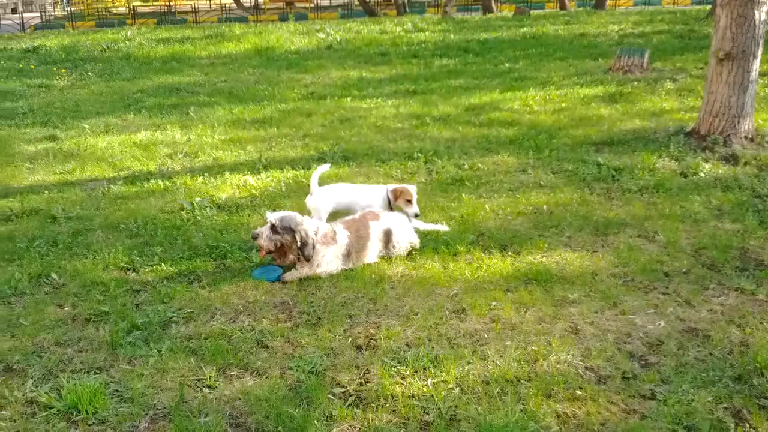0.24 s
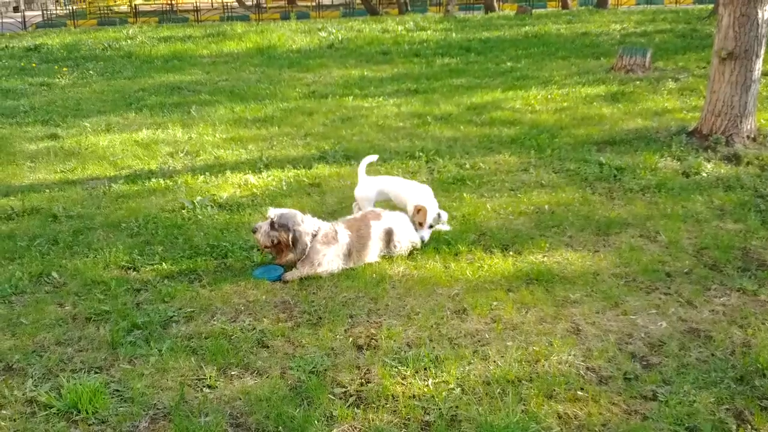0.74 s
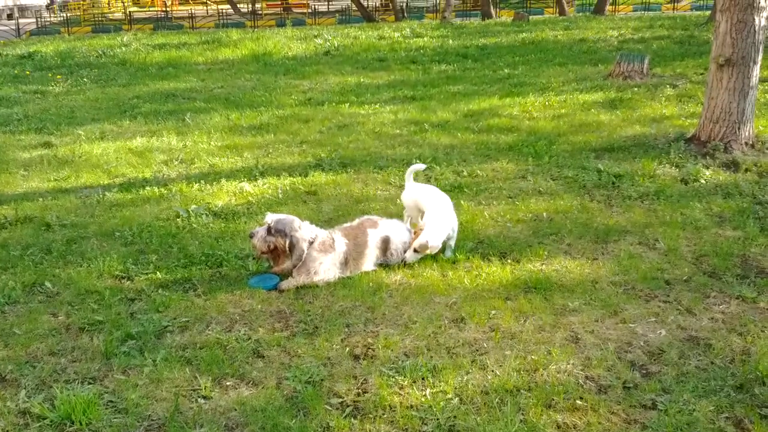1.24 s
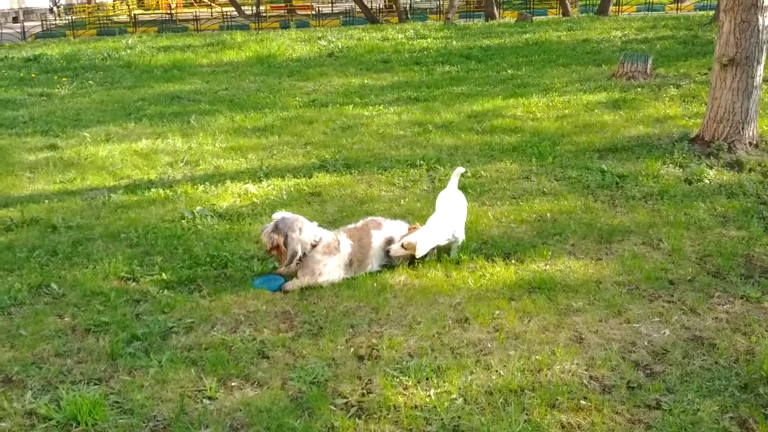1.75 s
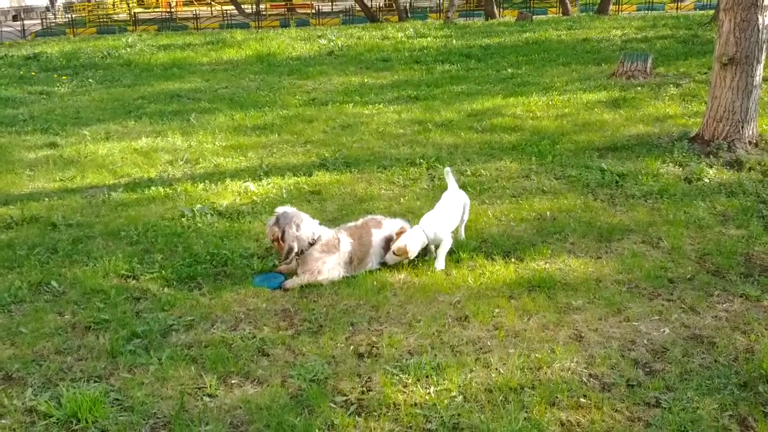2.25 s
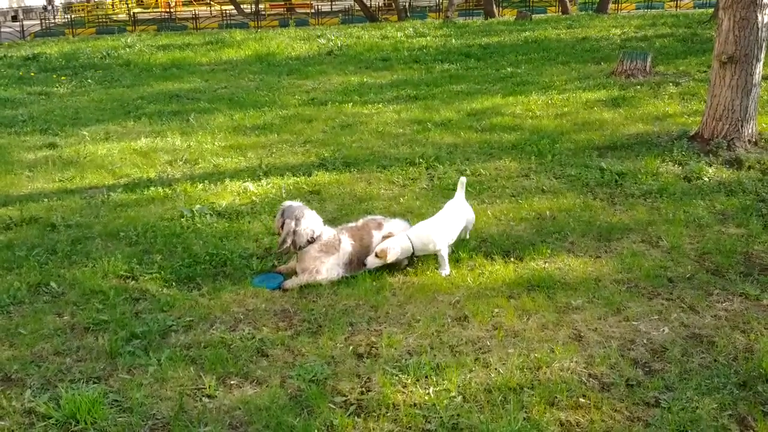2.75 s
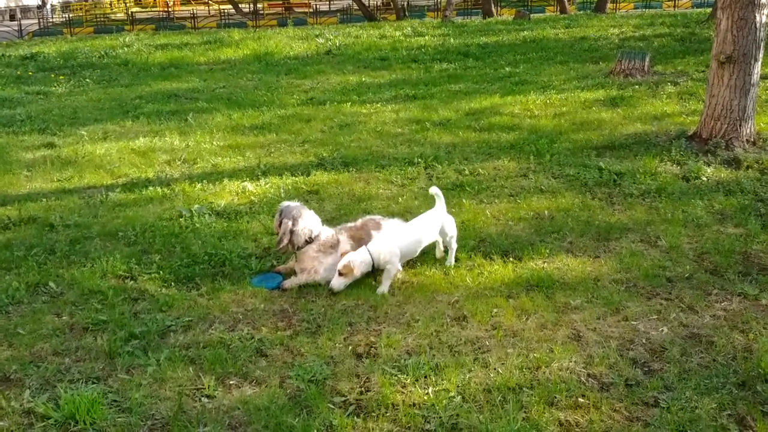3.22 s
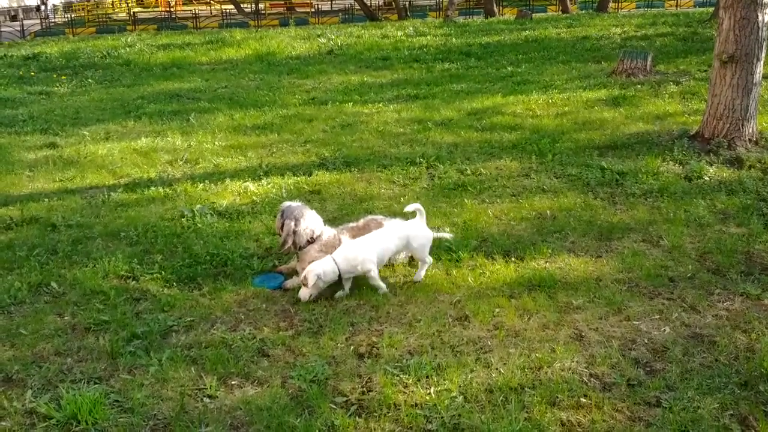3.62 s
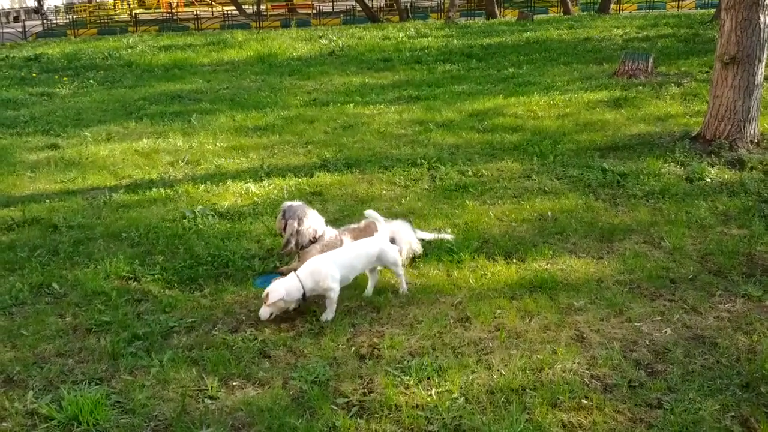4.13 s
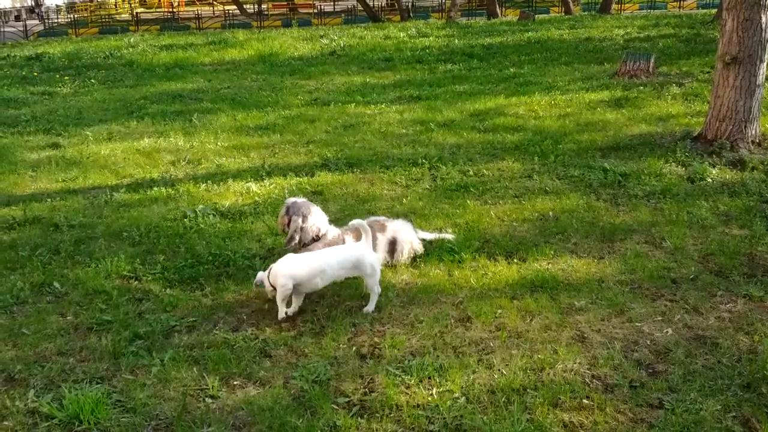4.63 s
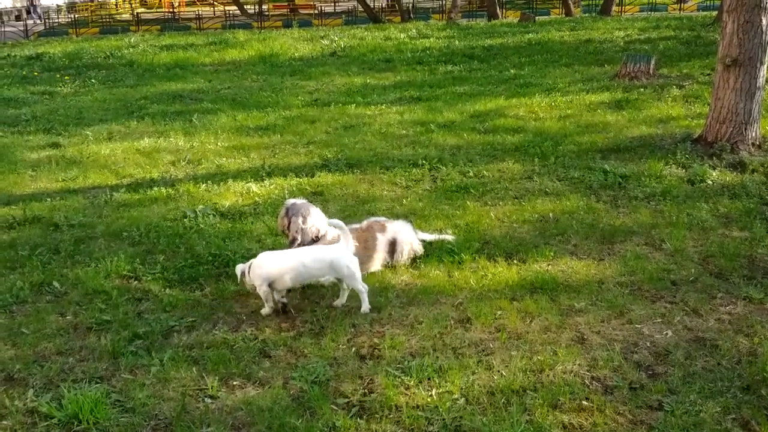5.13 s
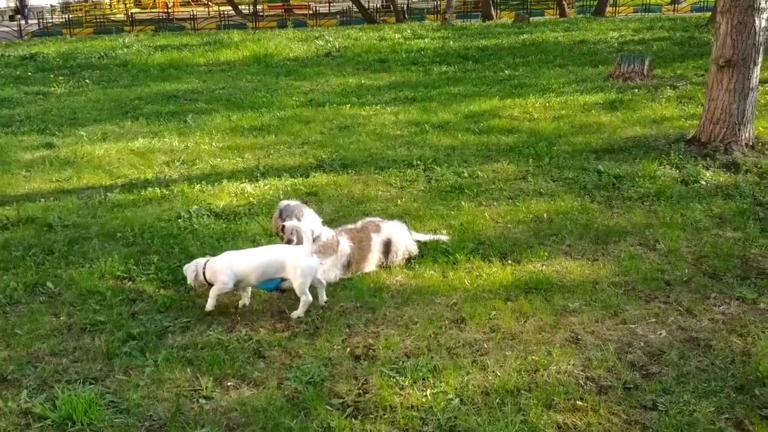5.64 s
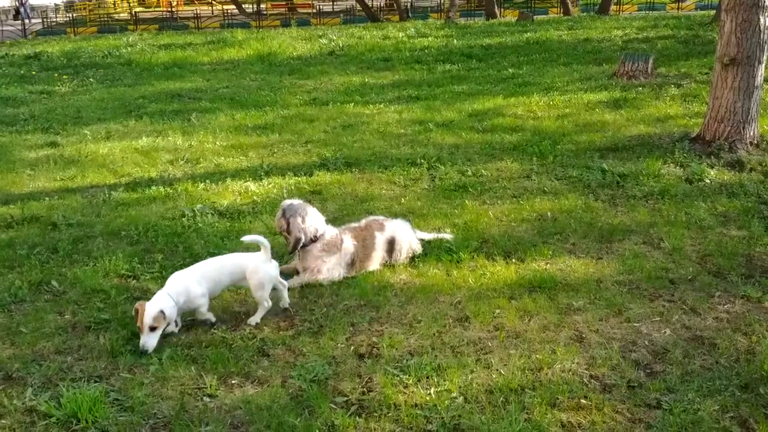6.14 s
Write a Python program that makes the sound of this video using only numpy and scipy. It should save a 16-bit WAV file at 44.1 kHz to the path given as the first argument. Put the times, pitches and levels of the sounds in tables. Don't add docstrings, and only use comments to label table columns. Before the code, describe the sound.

Distant road traffic heard from a grassy park through one microphone, almost mono. A heavy lorry's low drone and broad tyre hiss are strongest in the first two seconds, then recede into soft rumble and roar. A sparrow gives short hoarse chirrups near the start, around the middle and towards the end. Two dogs moving through grass add very faint brushing and tiny dry ticks.

```python
import sys
import numpy as np
from scipy import signal
from scipy.fft import rfft, irfft, next_fast_len
from scipy.io import wavfile
from scipy.ndimage import uniform_filter1d, map_coordinates

SR = 44100
rng = np.random.default_rng(int(sys.argv[2]) if len(sys.argv) > 2 else 0)


def transcribe(signal):
    frames = np.atleast_2d(signal).T
    limited = np.clip(frames, -1, 1)
    pcm = np.round(limited * 32767).astype(np.int16)
    wavfile.write(sys.argv[1], SR, pcm)


def gain_from_db(level_db):
    decades = np.asarray(level_db, float) / 20
    return 10 ** decades


N = 281137
TIME = np.arange(N) / SR


def unit(x):
    return x / np.sqrt(np.mean(x ** 2) + 1e-20)


def curves(rows):
    s, *columns = np.transpose(rows)
    return [np.interp(TIME, s, column) for column in columns]


def wobble(rate):
    knots = rng.standard_normal(int(N * rate / SR) + 4)
    return map_coordinates(knots, [np.arange(N) * rate / SR])


def bump(centre_s, half_width_s):
    return np.exp(-((TIME - centre_s) / half_width_s) ** 2)


def rush(spectrum, patchy_db):
    z = signal.stft(rng.standard_normal(N), nperseg=512)[2]
    field = uniform_filter1d(rng.standard_normal(z.shape), size=3, axis=0)
    field = uniform_filter1d(field, size=8, axis=1)
    noise = signal.istft(z * gain_from_db(patchy_db * unit(field)), nperseg=512)[1][:N]
    m = next_fast_len(N + 8192)
    hz, db = np.transpose(spectrum)
    log_bins = np.log(np.fft.rfftfreq(m, 1 / SR) + 1)
    colour = gain_from_db(np.interp(log_bins, np.log(hz + 1), db))
    return unit(irfft(rfft(noise, m) * colour, m)[:N])


# time in seconds, firing rate in Hz.
FIRING_RATE = [(0, 44), (1, 45.4), (2, 48.7), (2.4, 49.6), (3.2, 50.4), (4, 51.8), (4.3, 52), (4.6, 50.8),
               (5.2, 50.6), (5.7, 49.3), (6.37, 48.4)]
# time in seconds, level in dB.
FUNDAMENTAL = [(.06, -37), (.2, -38), (.4, -36), (.75, -40), (.9, -33), (1.25, -37), (1.59, -28.5),
               (1.85, -32), (2.2, -29.5), (2.45, -31.5), (2.77, -29.5), (2.9, -33), (3.38, -30.5),
               (4.05, -39), (4.25, -32.5), (4.5, -50), (5.15, -52), (5.75, -34)]
# time in seconds, strength of the higher orders in dB.
ENGINE_LOAD = [(0, -33), (.4, -3), (1.3, 2.5), (1.9, -2.5), (2.5, -5), (3, -7.5), (3.7, -6), (4.3, -12.5),
               (5.2, -2.5), (5.5, -9), (6.4, -6)]
# multiple of the firing rate, level at zero load strength in dB.
HIGHER_ORDERS = [(2, -41), (3, -48.5), (4, -49), (5, -48), (5.5, -53)]
SCATTERED_DB = -52
OTHER_DB, OTHER_FROM_S, OTHER_RISE_S = -45, 4.3, .15
BEAT_HZ, BEAT_PEAK_S = 3.92, 4.56


def engine():
    (hz,), (first_db,), (load_db,) = curves(FIRING_RATE), curves(FUNDAMENTAL), curves(ENGINE_LOAD)
    turn = 2 * np.pi * np.cumsum(hz) / SR
    drone = gain_from_db(first_db + 0.16 * wobble(2.1)) * np.sin(turn + 0.098 * wobble(5.9))
    drone += gain_from_db(SCATTERED_DB) * (wobble(7) * np.sin(turn) + wobble(7) * np.cos(turn))

    other_turn = turn + 2 * np.pi * BEAT_HZ * (TIME - BEAT_PEAK_S)
    other_swell = np.clip((TIME - OTHER_FROM_S) / OTHER_RISE_S, 0, 1)
    drone += gain_from_db(OTHER_DB) * other_swell * np.sin(other_turn)

    for multiple, db in HIGHER_ORDERS:
        wavering_turn = multiple * (turn + 0.17 * wobble(6))
        drone += gain_from_db(load_db + db + 0.48 * wobble(6)) * np.sin(wavering_turn)
    return np.sqrt(2) * drone


# time in seconds, nearness in dB (0 = closest).
NEARNESS_CURVE = [(.06, -6), (.3, -4), (.44, -1.5), (.69, 0), (.85, -1.5), (1.34, 0), (1.76, -2),
                  (1.91, -4), (2.5, -6.5), (2.65, -7), (3.2, -10), (4.05, -9), (4.3, -10.5), (4.8, -11),
                  (4.92, -10), (5.1, -11), (5.7, -12), (6.1, -13.5)]
# time in seconds, half width in seconds, lift in dB.
PASSING_CARS = [
    (.05, .3, 1.5),
    (.6, .2, 1),
    (1, 0.19, 0.5),
    (2.05, 0.17, 1.5),
    (3.1, 0.14, 1.5),
    (3.8, 0.22, 2),
    (5.7, 0.32, 3),
]
# frequency in Hz, density in dB per Hz.
DEEP_SPECTRUM = [(8, -31), (16, -19), (23, -11), (29, 1), (40, -7), (50, -7.5), (65, 0), (80, -1.5),
                 (100, -3), (125, -8), (180, -60)]
# frequency in Hz, density in dB per Hz.
RUMBLE_SPECTRUM = [(60, -62), (95, -18.5), (125, -4), (170, -5), (230, -7.5), (280, -9.5), (350, -12),
                   (462, -17), (600, -30), (780, -47), (1320, -120)]
# frequency in Hz, density in dB per Hz.
ROAR_SPECTRUM = [(280, -8.5), (480, -9.5), (528, -4), (736, -1), (1220, 0), (2200, -7.5), (2860, -16.5),
                 (4840, -120)]
# frequency in Hz, density in dB per Hz.
TREAD_SPECTRUM = [(2000, -60), (2300, -6), (2460, 2), (2650, -6), (3000, -60)]
# frequency in Hz, density in dB per Hz.
FAR_HISS = [(1120, -19.5), (1900, -32), (2220, -6), (2680, 0), (3110, -3.5), (3790, -3), (4300, -4.5),
            (4560, -3.5), (4740, 0.5), (4920, -5.5), (5560, -6), (7030, -5), (8300, -19), (12000, -85)]
# frequency in Hz, density in dB per Hz.
NEAR_HISS = [(1120, -21), (1900, -11), (2200, -9.5), (2450, -4), (2750, -8), (3370, -6), (4940, -9),
             (5560, -6), (6300, -8.5), (7430, -9.5), (8300, -17.5), (10800, -49), (18300, -120)]
# frequency in Hz, density in dB per Hz.
FIZZ_SPECTRUM = [(4710, -6), (8000, -4), (9170, -4), (11100, -4.5), (12600, -12), (15800, -27)]
DEEP_DB, HISS_DB = -43, -38
RUMBLE_DB, RUMBLE_FADES_DB_PER_S, RUMBLE_FOLLOWS = -37, 1.5, 0.055
ROAR_DB, ROAR_FOLLOWS = -41.5, 0.49
FIZZ_DB, FIZZ_FOLLOWS, STILL_FIZZ_DB = -45, 1.26, -65
TREAD_DB, TREAD_S, TREAD_HALF_S = -50, 1.35, .55
SWELL_LOW, SWELL_HIGH = 0.78, 0.32
NEAR_FADES_DB = 10


def traffic():
    near_db, = curves(NEARNESS_CURVE)
    flutter = wobble(14)
    cars_db = sum(lift_db * bump(s, half_width) for s, half_width, lift_db in PASSING_CARS)

    deep = gain_from_db(DEEP_DB + .8 * wobble(2.2)) * rush(DEEP_SPECTRUM, patchy_db=.55)

    rumble_db = RUMBLE_DB - RUMBLE_FADES_DB_PER_S * TIME + RUMBLE_FOLLOWS * near_db
    rumble_db += 0.27 * wobble(2.7) + SWELL_LOW * cars_db
    rumble = gain_from_db(rumble_db) * rush(RUMBLE_SPECTRUM, patchy_db=0.2)

    roar_db = ROAR_DB + ROAR_FOLLOWS * near_db + SWELL_HIGH * cars_db + 0.11 * flutter
    roar = gain_from_db(roar_db) * rush(ROAR_SPECTRUM, patchy_db=0.3)

    tread = gain_from_db(TREAD_DB) * bump(TREAD_S, TREAD_HALF_S) * rush(TREAD_SPECTRUM, patchy_db=1.0)

    share = np.clip(1 + near_db / NEAR_FADES_DB, 0, 1)
    hiss = np.sqrt(share) * rush(NEAR_HISS, patchy_db=1.06)
    hiss += np.sqrt(1 - share) * rush(FAR_HISS, patchy_db=1.45)
    hiss *= gain_from_db(HISS_DB + near_db + 0.13 * flutter)

    fizz_strength = np.hypot(gain_from_db(FIZZ_DB + FIZZ_FOLLOWS * near_db), gain_from_db(STILL_FIZZ_DB))
    fizz = fizz_strength * gain_from_db(0.22 * flutter) * rush(FIZZ_SPECTRUM, patchy_db=1.2)
    return deep + rumble + roar + tread + hiss + fizz


# offset in seconds, length in seconds, first Hz, last Hz, level in dB.
ARCH_GLIDES = [(-.006, .018, 3600, 4800, -5), (.003, .022, 4720, 4540, -2), (.018, .012, 4500, 5300, -7),
               (.026, .016, 5100, 3450, -2), (.048, .018, 3600, 3100, -8), (.063, .019, 3400, 4000, 0),
               (.078, .016, 4000, 3100, -8)]
# start in seconds, level in dB.
ARCH_CALLS = [
    (.186, -42),
    (2.861, -39),
    (4.903, -43),
]
# offset in seconds, length in seconds, first Hz, last Hz, level in dB.
CHIRRUP_GLIDES = [(-.008, .013, 4900, 5750, -10), (-.001, .01, 5500, 5950, -2),
                  (.014, .022, 4280, 4080, -2), (.029, .013, 4150, 3550, -3), (.048, .018, 3650, 4250, -1),
                  (.063, .02, 4200, 3350, -8)]
# start in seconds, level in dB.
CHIRRUP_CALLS = [
    (.362, -40.5),
    (2.456, -40.5),
    (3.048, -39.5),
    (4.022, -46.5),
    (4.314, -46.5),
    (4.845, -42.5),
    (4.885, -49),
]


def sparrow():
    song = np.zeros(N)
    for glides, calls in (CHIRRUP_GLIDES, CHIRRUP_CALLS), (ARCH_GLIDES, ARCH_CALLS):
        for offset, length, first_hz, last_hz, glide_db in glides:
            u = np.linspace(-1, 1, round(length * SR))
            hz = np.linspace(first_hz, last_hz, len(u))
            turn = 2 * np.pi * np.cumsum(hz) / SR
            tone = np.sin(turn) + gain_from_db(-20) * np.sin(2 * turn) + gain_from_db(-25) * np.sin(3 * turn)
            swell = (1 - u * u) ** 0.6 * gain_from_db(glide_db)
            for start, db in calls:
                song[round((start + offset) * SR):][:len(u)] += gain_from_db(db) * swell * tone
    song *= gain_from_db(1.3 * wobble(90))

    t = np.arange(SR // 4) / SR
    scatter = rng.standard_normal(len(t)) * gain_from_db(-60 * t / .18) * (t > .004)
    blur = signal.fftconvolve(song, scatter / np.linalg.norm(scatter))[:N]
    return song + gain_from_db(-9) * blur


# start in seconds, length in seconds, level in dB.
BRUSHES = [
    (.4, .1, -62),
    (0.657, 0.073, -51),
    (2.023, 0.072, -50),
    (2.2, 0.28, -65),
    (2.857, .12, -62),
    (3.6, 0.46, -69),
    (4.194, 0.17, -56),
    (4.4, 1.35, -60),
]
RUSTLE_RISE_S, RUSTLE_FALL_S = 0.0099, 0.052


def rustle():
    strength = np.zeros(N)
    for start, length, db in BRUSHES:
        rise = np.clip((TIME - start) / RUSTLE_RISE_S, 0, 1)
        fall = np.exp(-np.clip(TIME - start - length, 0, None) / RUSTLE_FALL_S)
        strength += gain_from_db(db) * rise * fall
    return strength * gain_from_db(0.48 * wobble(14)) * rush(FIZZ_SPECTRUM, patchy_db=3.8)


# time in seconds, level in dB (the peak lies 9 dB above it), centre in Hz, relative
GRASS_TICKS = [(1.931, -56, 15200, .04), (1.938, -56, 15200, .04), (1.954, -56, 14300, .08),
               (1.963, -57, 15000, .04), (1.982, -52, 14300, .08), (1.9961, -44, 13800, .1),
               (2.804, -45, 6300, 0.092), (3.203, -55, 6200, .07), (3.208, -54, 12000, .2),
               (3.257, -56, 13500, .15), (3.37, -45, 6300, .07), (3.463, -54, 7300, .05),
               (4.196, -52, 12480, .15), (5.141, -54, 13200, .14), (5.926, -51, 9970, .3),
               (6.044, -55, 6000, .15), (6.05, -53, 7500, .2), (6.053, -53, 10000, .15),
               (6.056, -49, 10500, .18), (6.065, -51, 7000, .2), (6.08, -53, 13110, .2),
               (6.085, -54, 7200, .12), (6.09, -54, 6050, .15)]
SNAP_S, RING_S = 0.0061, .0003


def grass():
    out = np.zeros(N)
    t = np.arange(SR // 20) / SR
    for start, db, hz, spread in GRASS_TICKS:
        edges_hz = [hz * (1 - spread), hz * (1 + spread)]
        band = signal.butter(3, edges_hz, "bandpass", fs=SR, output="sos")
        decay = gain_from_db(-60 * t / (SNAP_S + RING_S / spread))
        snap = signal.sosfilt(band, rng.standard_normal(len(t)) * decay)
        out[round(start * SR):][:len(t)] += gain_from_db(db + 9.0) * snap / np.abs(snap).max()
    return out


def scene():
    sound = engine() + traffic() + sparrow() + rustle() + grass()
    return np.array([sound, sound])


SPLIT_TIMES = [.468, 1.118, 1.258, 1.258, 1.306, 1.327, 1.35, 1.35, 1.445, 1.445, 1.538, 1.817, 1.817,
               1.863, 1.863, 2.234, 2.397, 2.397, 2.721, 2.908, 2.908, 3.49, 3.655, 3.655, 4.325, 4.325,
               4.325, 4.348, 5.533]
SPLIT_LOW_HZ, SPLIT_TOP_HZ, SPLIT_WIDE_HZ = 4200, 15850, 1450
FRAME, GRID = 1024, 161


def side_bursts(mono):
    side = np.zeros(N)
    hz = np.fft.rfftfreq(2 * FRAME, 1 / SR)
    window = np.sin(np.pi * (np.arange(2 * FRAME) + .5) / (2 * FRAME))
    for s in SPLIT_TIMES:
        where, wide = rng.random(2)
        at = round((s * SR - GRID) / FRAME - 1) * FRAME + GRID
        high_hz = SPLIT_TOP_HZ - where ** 2 * (SPLIT_TOP_HZ - SPLIT_LOW_HZ - SPLIT_WIDE_HZ)
        low_hz = max(high_hz - SPLIT_WIDE_HZ * (1 + (wide > .75)), SPLIT_LOW_HZ)
        later = mono[at + 2 * FRAME:at + 4 * FRAME]
        band = irfft(rfft(later) * ((hz > low_hz) & (hz < high_hz)))
        rise, fall = np.split(window * band, 2)
        folded = np.r_[rise - rise[::-1], fall + fall[::-1]]
        side[at:at + 2 * FRAME] += gain_from_db(-2.5) * window * folded
    return side


def low_pass(x):
    return signal.sosfilt(signal.butter(12, 15900, fs=SR, output="sos"), x)


# frequency in Hz, density in dB per Hz.
SELF_NOISE = [(3000, -40), (8000, -27), (12000, -6), (14000, 0), (15900, -6)]
START_S = .0531


def record(dry):
    whistle = gain_from_db(-93) * np.sin(2 * np.pi * 14890 * TIME)
    hiss = gain_from_db(-69.0) * rush(SELF_NOISE, patchy_db=3.0)
    mono = (dry[0] + hiss + whistle) * (np.arange(N) >= START_S * SR)
    side = side_bursts(mono)
    return low_pass(np.array([mono + side, mono - side]))


dry = scene()
out = record(dry)
transcribe(out)
```